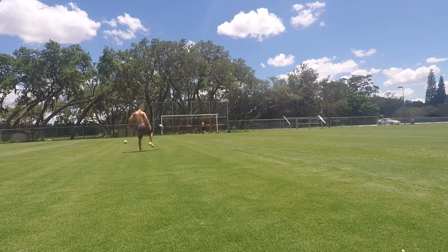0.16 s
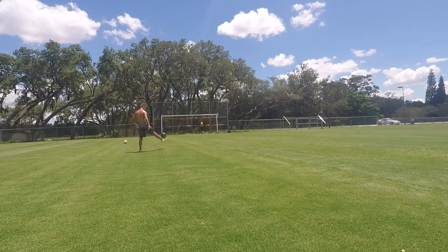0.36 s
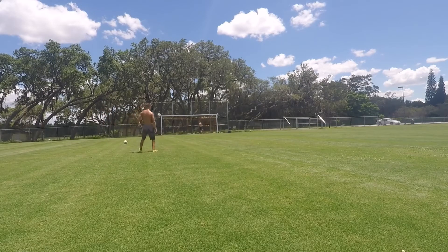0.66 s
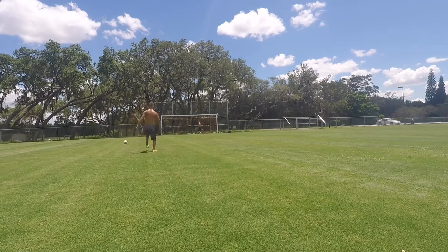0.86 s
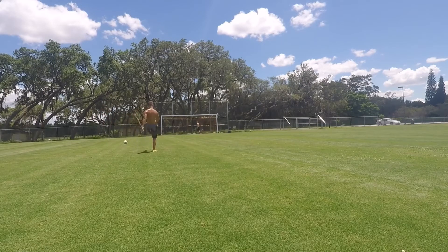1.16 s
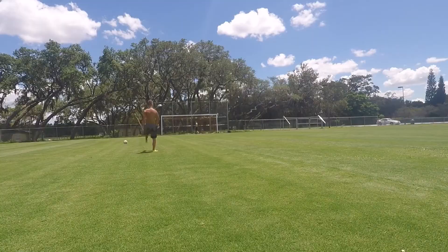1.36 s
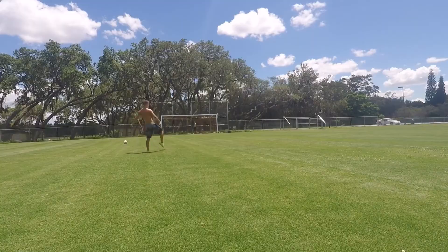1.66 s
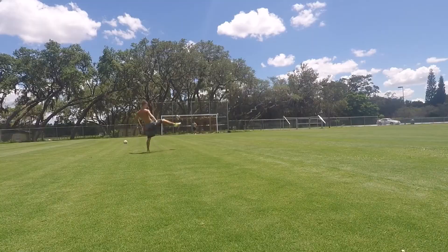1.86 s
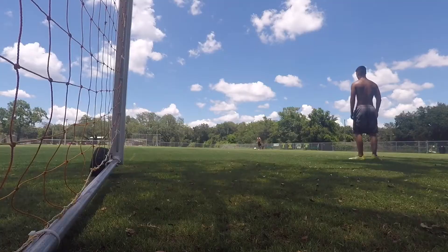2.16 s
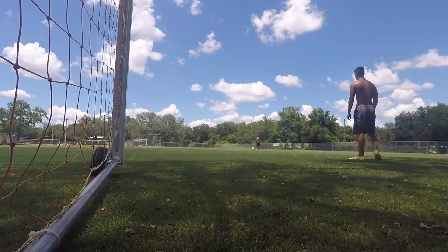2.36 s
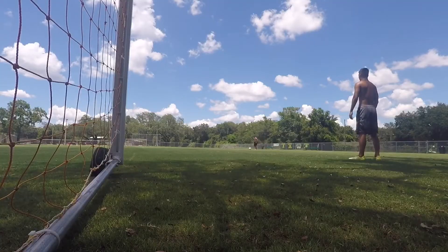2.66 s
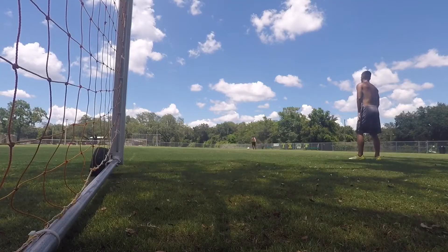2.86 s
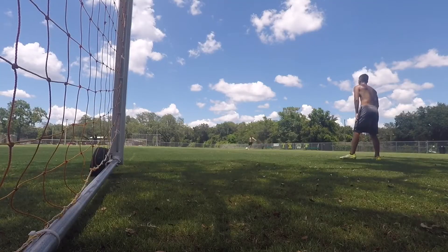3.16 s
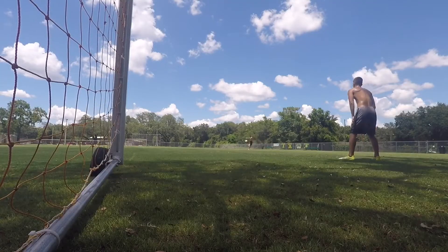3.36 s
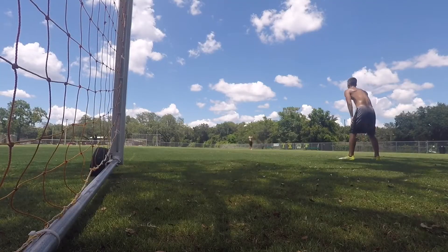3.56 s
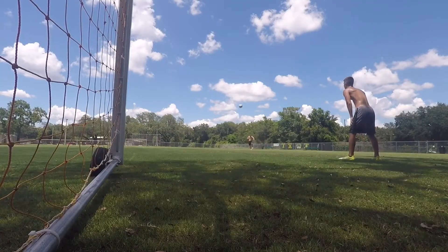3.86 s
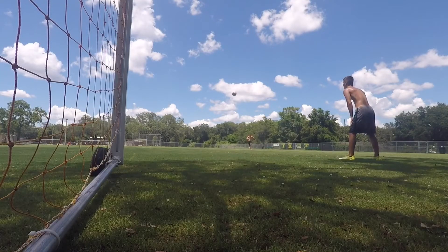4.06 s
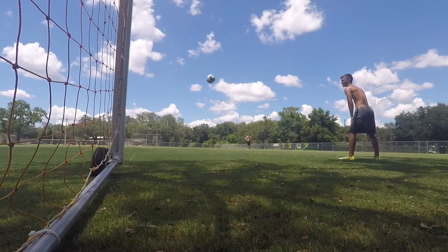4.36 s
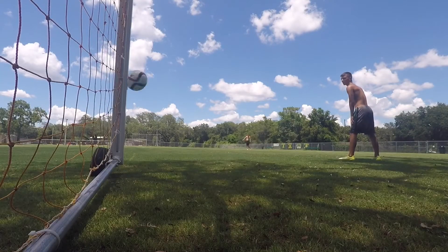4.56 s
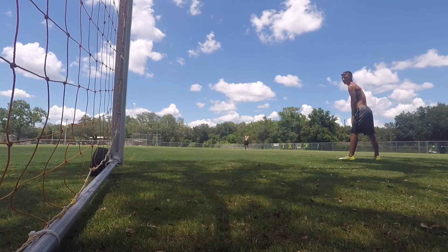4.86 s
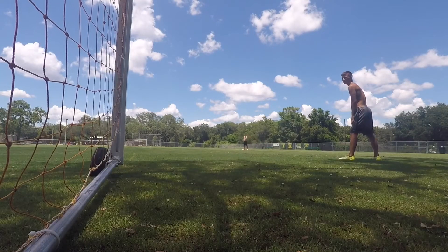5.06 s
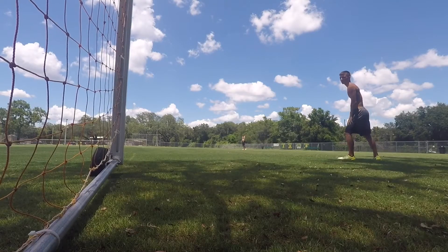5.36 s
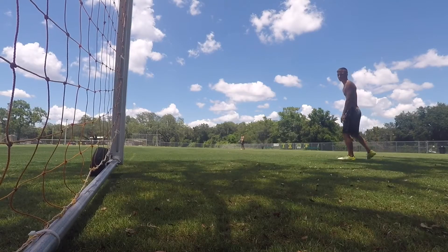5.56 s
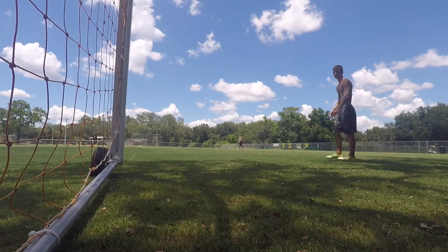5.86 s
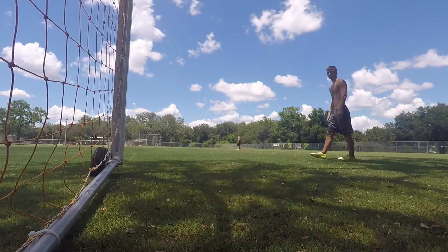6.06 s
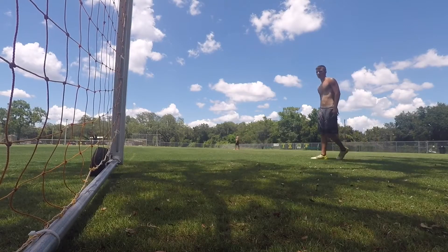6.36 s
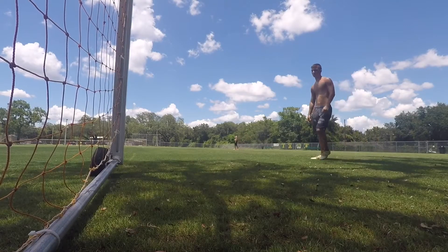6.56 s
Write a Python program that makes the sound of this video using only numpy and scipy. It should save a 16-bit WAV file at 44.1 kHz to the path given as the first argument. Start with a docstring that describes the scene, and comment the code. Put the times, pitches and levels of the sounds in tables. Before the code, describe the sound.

On an open grass field, light wind rumbles low under soft air hiss, a faint far hum, a very thin high whine and delicate insects. A dull knock with a crisp tick comes at 0.4 s, a thin falling bird chirp at 0.7 with tiny notes near 1.0, then softer, duller thuds at 1.1 and 1.9. Around 2.05 the air drops sharply and swells back over a second, now close beside a metal goal, without insects; a tiny high bird peep sounds at 2.5. At 3.3 a boot thumps the ball, low and short, with a faint tree-line tail. At 4.6 the ball slams into the near post: very loud, heavy, crashing, the hollow frame ringing. Three rapid hollow knocks follow at 4.75-4.78, then the net shivers, tugging dully and rustling until about 5.5, fading into steady breeze to the end around 6.7.

```python
"""Football against a metal goal

A football field in light wind, heard first from midfield, then from the foot of a metal goal.
After a few dull knocks a ball is kicked, slams into the ringing frame, then rebounds and shakes the net.
Hits are low thumps, noise bursts and dying tones; the net is noise shaped by tugs. Filtered noise makes
wind, hiss, far hum and, at midfield, faint insects; sine tones make a bird and a thin steady whine."""
import sys
import numpy as np
from scipy import signal
from scipy.fft import rfft, irfft, next_fast_len
from scipy.io import wavfile
from scipy.ndimage import map_coordinates

SR = 44100
rng = np.random.default_rng(int(sys.argv[2]) if len(sys.argv) > 2 else 0)


def to_wav(s):
    """Save 16-bit WAV."""
    ch = np.atleast_2d(s).T  # columns
    pcm = np.round(np.clip(ch, -1, 1) * 32767)  # PCM
    wavfile.write(sys.argv[1], SR, pcm.astype(np.int16))


N = 295320
TIME = np.arange(N) / SR  # seconds from the start
AGE = np.arange(SR * 2) / SR  # seconds since a blow

# In all tables t60_s is the time a sound takes to fall by 60 dB.
# Level columns are relative: mixing gains, random scatter, swells or the fade may act on them later.

# Far machinery: pitch_hz, width_hz, level_db
HUM_BANDS = [(115, 12.2, -52.5), (298.5, 5.3, -59)]
# Insects, one narrow band each: pitch_hz, width_hz, level_db
INSECT_BANDS = [(4750, 220, -78.5), (5140, 220, -81), (7660, 280, -78.5), (8520, 280, -79),
                (9270, 350, -77.5), (10000, 300, -81.5)]
# Thin steady whine: pitch_hz, level_db (rms)
WHINE_TONES = [(7337, -84), (14626, -92), (14675, -76.5), (14723, -77)]
# Colour of the wind rumble at each place: frequency_hz, level_db (per Hz)
MIDFIELD_RUMBLE = [(12, -30), (20, -5.5), (43, 4), (140, -5.5), (199, -11), (240, -12.5), (298, -20.5),
                   (317, -29.5), (348, -18), (606, -35), (800, -38.5), (1040, -80), (1760, -120)]
GOALMOUTH_RUMBLE = [(12, -27), (20, 4), (113, -1), (182, -9), (209, -14.5), (263, -16.5), (293, -13.5),
                    (322, -19), (675, -35.5), (729, -30.5), (800, -70), (1040, -71), (1760, -120)]
# Colour of the air's hiss at each place: frequency_hz, level_db (per Hz)
MIDFIELD_AIR = [(300, -13.5), (800, 5.5), (1300, 1.5), (3300, -0.5), (3800, -2.5), (5300, -3.5), (7000, -9),
                (11000, -12.5), (15000, -14)]
GOALMOUTH_AIR = [(300, -18), (800, 6), (1300, 0.5), (2500, -1), (5000, -3.5), (7000, -8.5), (11000, -12.5),
                 (15000, -11.5)]
# Bird notes: start_s, length_s, start_pitch_hz, end_pitch_hz, level_db
BIRD_NOTES = [(0.676, 0.12, 3580, 2830, -62), (.97, 0.043, 2500, 2340, -71),
              (1.017, 0.041, 2350, 2450, -66), (2.542, .045, 5450, 5450, -68)]
# Dull knocks: start_s, thump_level_db, pitch_hz, swell_s, tick_level_db, tick_centre_hz, tick_width_octaves
KNOCKS = [(.377, -21, 100, .0072, -25.5, 3100, .48), (1.1163, -21, 74, .0085, -48, 1900, .7),
          (1.902, -23, 70, .0082, -32.5, 2300, 2.2)]
# Tones inside each tick: pitch_hz, level_db, t60_s
TICK_MODES = [(1050, -1, .012), (1650, 2, .007), (2550, 1, .008), (3300, -1, .01), (4000, 1, .007),
              (5200, 0, .006), (6300, -8, .005), (11500, -5, .002)]
# Colour of the scuffed turf: frequency_hz, level_db (per Hz)
TURF_COLOUR = [(100, -13.5), (380, 4.5), (600, -18.5), (1000, -23), (3000, -58), (6000, -51), (12000, -73)]
# Colour of the tree-line echo: frequency_hz, level_db (per Hz)
TREE_COLOUR = [(200, 3.5), (450, 1.5), (1000, -14.5), (3000, -13), (6000, -28), (12000, -43)]
# Tones of the boot's first contact: pitch_hz, level_db, t60_s
BOOT_MODES = [(555, 0.5, 0.025), (884, -6, .018)]
# Tones of the goal frame and the air in the ball: pitch_hz, level_db, t60_s
FRAME_MODES = [(59, -17.5, .8), (188, -13, .42), (243, -19, .2), (281, -21, .27), (367, -21, .38),
               (412, -24, .22), (480, -30, .5), (586, -27.5, .32), (687, -27, .35), (750, -34, .4),
               (826, -30, .4), (918, -31, .35), (965, -38, .45), (1006, -33, .35), (1111, -34, .35),
               (1237, -39, .35), (1288, -36, .35), (1470, -41, .3), (1518, -39, .35), (1654, -36, .32),
               (1743, -33, .35), (2035, -35, .33), (2345, -39, .35), (2565, -43, .45), (2830, -53, 1.3),
               (3066, -48, .7), (4018, -46, .22), (5169, -37, .19), (8250, -58, .5), (11070, -54, .2)]
# Tones of the ball and the ground bar at the rebound: pitch_hz, level_db, t60_s
BOUNCE_MODES = [(62.4, -16.5, 0.17), (123, -22.5, 0.22), (214, -13, 0.088), (280, -7, 0.041),
                (402.6, -14, 0.075), (470, -51, 0.14), (557, -34, 0.18), (927, -33, 0.088),
                (985, -37, 0.12)]
# Quick hits of the rebounding ball on the ground bar: start_s, knock_level_db, slap_level_db, click_level_db
BAR_HITS = [(4.7515, 3, -19.5, -22.5), (4.7638, -7.5, -22.5, -32), (4.7773, -5, -33.5, -49)]
# Tugs of the net on the frame: start_s, level_db, swell_s
NET_TUGS = [(4.907, -45, .003), (4.926, -45, 0.014), (5.058, -38, .018), (5.127, -35.5, 0.0044),
            (5.238, -47, .003), (5.25, -46, 0.014), (5.421, -47, 0.007), (5.477, -46, 0.0047)]
# Colours of the net's tugs and of its rustling cords: frequency_hz, level_db (per Hz)
NET_COLOUR = [(120, -13), (200, -5), (360, 1.5), (700, -18.5), (1000, -18.5), (1500, -29.5), (2300, -35),
              (2850, -39), (3500, -51), (5500, -59), (15000, -90)]
CORD_COLOUR = [(500, -10), (2000, 3.5), (2850, 5), (3500, -2), (5500, -2.5), (8000, -15), (15000, -32)]
# Starting colours of the noisy hits: frequency_hz, level_db (per Hz)
CRASH_COLOUR = [(150, -16), (250, -4), (397, -4), (589, -12), (1270, -20), (1540, -23.5), (1730, -23),
                (1890, -33), (2060, -20.5), (4520, -43), (5280, -27), (5750, -55), (15000, -46.5)]
SHIMMER_COLOUR = [(130, -11), (220, 1.5), (322, -12), (358, -17), (525, -14.5), (572, -8.5), (964, -34),
                  (1360, -25), (1770, -22), (3090, -30.5), (3490, -36), (4150, -30.5), (14000, -61)]
SLAP_COLOUR = [(150, -14), (300, 4.5), (420, 2.5), (600, -15), (1000, -10), (1300, -19), (2500, -26),
               (4000, -27.5), (5500, -29.5), (8200, -44), (9500, -53), (15000, -47)]
# How fast those hits die away: frequency_hz, t60_s
CRASH_DECAY = [(300, 0.14), (1500, 0.063), (5000, 0.15), (12000, 0.11)]
SHIMMER_DECAY = [(250, 1.0), (800, 1), (2200, 0.56), (2950, 0.98), (3800, 0.41), (12000, 0.65)]
SLAP_DECAY = [(300, 0.14), (1000, 0.2), (3000, 0.19), (6000, 0.17), (12000, 0.16)]

MOVE_S = 2.055  # the listening place changes from midfield to goalmouth
FADE_OUT_S, FADE_IN_S, HUSH_DB = 0.036, 0.98, -31.5  # the air drops away and returns; its lowest gain
MIDFIELD_WIND_DB, GOALMOUTH_WIND_DB = -39, -37.5  # breeze level before swells and fade
GUST_DB, GUSTS_PER_S = 0.2, 2.537  # size and rate of the slow random swells
KICK_S, POST_S = 3.3132, 4.588  # the boot meets the ball; the ball meets the post
TAP_DB, ECHO_S = -30.5, .018  # gain of the boot's tap; delay of the tree line's answer
SWAY_DB, SWAY_T60_S = -42, 1.97  # the whole net shivers after the rebound
TOP_HZ = 15200  # upper limit of the sound


def amp(db):
    """Turn decibels into a gain."""
    return 10 ** (np.asarray(db) / 20)


def unit(x):
    """Scale a sound to rms 1."""
    return x / np.sqrt(np.mean(x ** 2) + 1e-20)


def along(points, hz):
    """Read values between (frequency, value) points, on a log frequency axis."""
    f, v = np.transpose(points)
    return np.interp(np.log(hz + 1), np.log(f + 1), v)


def wobble(rate):
    """Draw a smooth random curve through `rate` random points a second."""
    points = rng.standard_normal(int(N * rate / SR) + 4)
    return map_coordinates(points, [TIME * rate])


def filtered(x, response):
    """Scale each frequency of x by the gain response(hz)."""
    size = next_fast_len(len(x) + SR // 2)
    hz = np.fft.rfftfreq(size, 1 / SR)
    return irfft(rfft(x, size) * response(hz), size)[:len(x)]


def noise(colour):
    """Make coloured noise of rms 1."""
    return unit(filtered(rng.standard_normal(N), lambda hz: amp(along(colour, hz))))


def narrow(bands):
    """Add up fuzzy tones, each a narrow band of noise."""
    total = np.zeros(N)
    for pitch, width, db in bands:
        band = filtered(rng.standard_normal(N), lambda hz: 1 / (1 + (2 * (hz - pitch) / width) ** 2))
        total += amp(db) * unit(band)
    return total


def at(start_s, x):
    """Place a sound at start_s on a silent track."""
    return np.pad(x, (round(start_s * SR), N))[:N]


def falling(t60):
    """A steady die-away, 60 dB down after t60 seconds."""
    return amp(-60 * AGE / t60)


def dying(colour, decays):
    """Many packed vibrations: noise in which each frequency dies at its own speed."""
    hz, t, cells = signal.stft(noise(colour)[:len(AGE)], SR, nperseg=256)
    cells = cells * amp(-60 * t / along(decays, hz)[:, None])
    return signal.istft(cells, SR, nperseg=256)[1][:len(AGE)]


def ring(modes, attack, scatter_db, polarity=1):
    """Dying sine tones, each of random strength set by scatter_db; polarity -1 flips every other tone."""
    tones = np.zeros(len(AGE))
    for k, (hz, db, t60) in enumerate(modes):
        strength = amp(db + scatter_db * rng.standard_normal())
        tones += polarity ** k * strength * falling(t60) * np.sin(2 * np.pi * hz * AGE)
    return tones * (1 - np.exp(-AGE / attack))


def thump(hz, swell, sag, settle):
    """A few low cycles whose pitch falls as the contact softens."""
    u = AGE / swell
    cycles = hz * AGE + sag * (1 - np.exp(-AGE / settle))
    return (u * np.exp(1 - u)) ** 2 * np.sin(2 * np.pi * cycles)


def click(hz, t60):
    """A dry crack: a dying burst of noise, about two octaves wide."""
    band = signal.butter(2, [hz * .5, min(hz * 2, SR / 3)], "band", fs=SR)
    fizz = signal.lfilter(*band, rng.standard_normal(len(AGE)))
    return .5 * unit(fizz) * falling(t60)


def fade():
    """A quick fade out before the listening place changes, a slow straight fade in after it."""
    opening = np.maximum((MOVE_S - TIME) / FADE_OUT_S, (TIME - MOVE_S) / FADE_IN_S)
    return np.minimum(amp(HUSH_DB) + opening, 1)


def wind():
    """Moving air rumbles: low noise with its own colour at each place, swelling at random."""
    midfield = amp(MIDFIELD_WIND_DB) * noise(MIDFIELD_RUMBLE)
    goalmouth = amp(GOALMOUTH_WIND_DB) * noise(GOALMOUTH_RUMBLE)
    swells_db = GUST_DB * wobble(GUSTS_PER_S) + 1.62 * wobble(9)
    return np.where(TIME < MOVE_S, midfield, goalmouth) * amp(swells_db)


def insects():
    """Narrow bands of high noise, each swelling on its own."""
    return sum(narrow([band]) * amp(2.8 * wobble(2.87)) for band in INSECT_BANDS)


def hiss():
    """Smooth air noise that wavers a little, joined by the insects at midfield."""
    midfield = amp(-63.3) * noise(MIDFIELD_AIR) + insects()
    goalmouth = amp(-64.5) * noise(GOALMOUTH_AIR)
    return np.where(TIME < MOVE_S, midfield, goalmouth) * amp(0.37 * wobble(4.54))


def whine():
    """High sine tones whose phase drifts slightly."""
    total = np.zeros(N)
    for hz, db in WHINE_TONES:
        phase = 2 * np.pi * hz * TIME + .3 * wobble(12)
        total += amp(db) * np.sqrt(2) * np.sin(phase)
    return total


def air():
    """The background, faded around the change of place: wind, hiss, far hum and whine."""
    return fade() * (wind() + hiss() + narrow(HUM_BANDS) + whine())


def bird():
    """Thin whistles: sine tones that glide or hold, with a slight random waver in pitch."""
    song = np.zeros(N)
    for start, length, start_hz, end_hz, db in BIRD_NOTES:
        u = np.clip((TIME - start) / length, 0, 1)  # progress through the note
        pitch = (start_hz + (end_hz - start_hz) * u) * (1 + 0.0082 * wobble(120))
        song += amp(db) * np.sqrt(4 * u * (1 - u)) * np.sin(2 * np.pi * np.cumsum(pitch) / SR)
    return song


def knocks():
    """Each knock is a tick and a dull thump; the contact picks which of the tick's tones speak."""
    track = np.zeros(N)
    for start, db, hz, swell, tick_db, tick_hz, octaves in KNOCKS:
        # tones far from the tick's centre are weaker
        modes = [(f, level - 4.3 * (np.log2(f / tick_hz) / octaves) ** 2, t60)
                 for f, level, t60 in TICK_MODES]
        tick = ring(modes, attack=.00003, scatter_db=.5, polarity=-1)
        turf = amp(-15) * noise(TURF_COLOUR)[:len(AGE)] * falling(0.044)
        body = thump(hz, swell, sag=0.67, settle=0.0028) + turf
        track += at(start, amp(db) * body + amp(tick_db) * tick)
    return track


def net():
    """The net shivers ever less and tugs dully on the tubes; its cords rustle, growing less than the pull."""
    pull = at(BAR_HITS[-1][0], amp(SWAY_DB) * falling(SWAY_T60_S))
    for start, db, swell in NET_TUGS:
        u = AGE / swell
        pull = pull + at(start, amp(db) * u * np.exp(1 - u))
    knocking = pull * unit(noise(NET_COLOUR) * amp(2.5 * wobble(170)))
    cords = unit(noise(CORD_COLOUR) * amp(3.1 * wobble(250)))
    rustle = amp(-43.5) * np.sqrt(np.abs(pull)) * cords
    return knocking + rustle


def rebound():
    """The ball slaps down by the ground bar: quick hollow knocks; the first stirs the frame again."""
    track = at(BAR_HITS[0][0], amp(-27) * ring(FRAME_MODES, attack=.003, scatter_db=8))
    for start, knock_db, slap_db, click_db in BAR_HITS:
        slap = amp(slap_db) * dying(SLAP_COLOUR, SLAP_DECAY)
        crack = amp(click_db) * click(hz=3560, t60=0.032)
        knock = amp(knock_db) * ring(BOUNCE_MODES, attack=.0015, scatter_db=1)
        track += at(start, slap + crack + knock)
    return track


def kick():
    """The boot taps and thumps the ball and scuffs the turf, its shell rings; trees return a faint tail."""
    tap = amp(TAP_DB) * ring(BOOT_MODES, attack=0.00095, scatter_db=2.0)
    body = amp(-10.0) * thump(hz=93.0, swell=0.0083, sag=0.69, settle=0.0024)
    u = AGE / 0.004
    scuff = amp(-31.5) * noise(TURF_COLOUR)[:len(AGE)] * u * np.exp(1 - u)
    # shell tones: pitch_hz, level_db, t60_s
    shell = ring([(430, -21, .06), (640, -36, .04), (920, -41, .04)], attack=.002, scatter_db=.5)
    tail = amp(-48.5) * noise(TREE_COLOUR)[:len(AGE)] * falling(0.36)
    tail *= 1 - np.exp(-AGE / 0.0067)  # soft start
    return at(KICK_S, tap + body + scuff) + at(KICK_S + 0.011, shell) + at(KICK_S + ECHO_S, tail)


def post():
    """The ball grazes, then flattens on the tube: a heavy push, a crash and the ringing frame."""
    graze = amp(-18.0) * dying(CRASH_COLOUR, CRASH_DECAY) * falling(0.11)
    graze += amp(-30) * click(hz=2980, t60=0.042)
    push = amp(0.5) * thump(hz=89, swell=0.0062, sag=0.71, settle=0.0017)
    crash = amp(-10.5) * dying(CRASH_COLOUR, CRASH_DECAY) + amp(-21) * click(hz=2450, t60=0.084)
    shimmer = amp(-26.0) * dying(SHIMMER_COLOUR, SHIMMER_DECAY)
    tones = amp(-1.2) * ring(FRAME_MODES, attack=.0006, scatter_db=.7)
    tones *= amp(1.5 * wobble(140)[:len(AGE)])  # the ring's strength wavers quickly at random
    return at(POST_S - .0045, graze) + at(POST_S, push + crash + shimmer + tones)


def scene():
    """Add all the sounds into one channel."""
    return (air() + bird() + knocks() + net() + rebound() + kick() + post())[None]


def record(dry):
    """Round off the highest peaks, then cut steeply above the upper limit."""
    rounded = dry[0] / (1 + np.abs(dry[0] / .95) ** 8) ** (1 / 8)
    return filtered(rounded, lambda hz: 1 / (1 + (hz / TOP_HZ) ** 120))[None]


dry = scene()
out = record(dry)
to_wav(out)
```